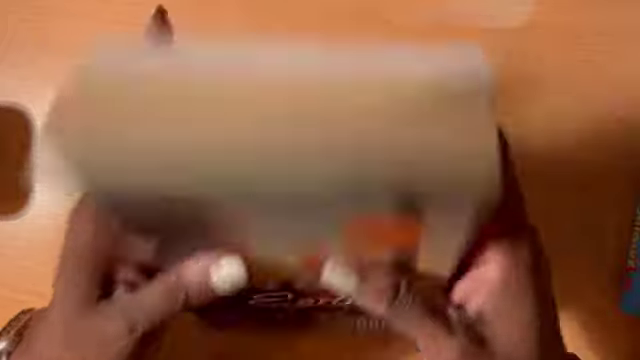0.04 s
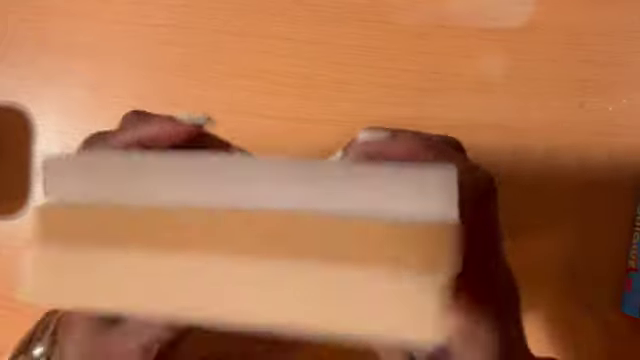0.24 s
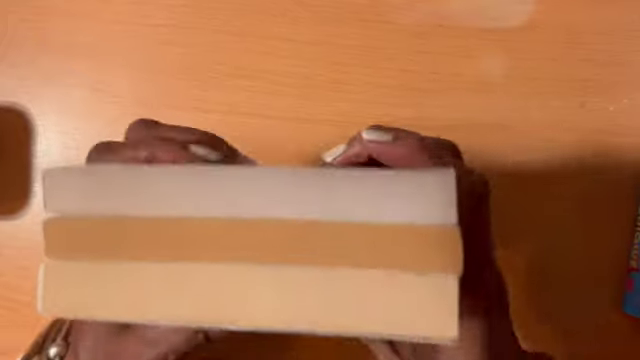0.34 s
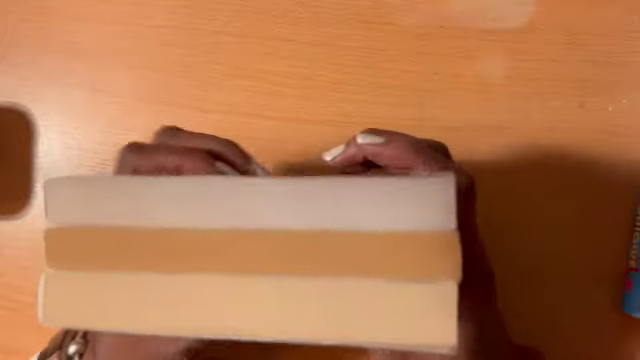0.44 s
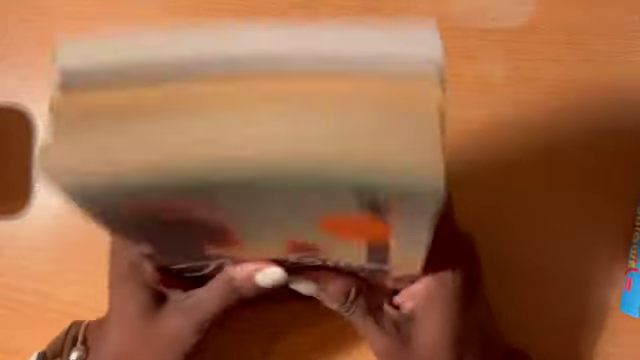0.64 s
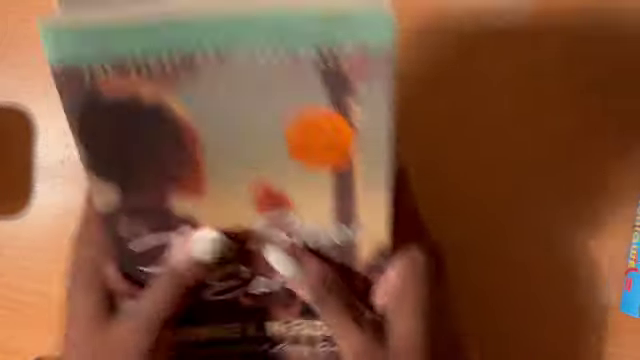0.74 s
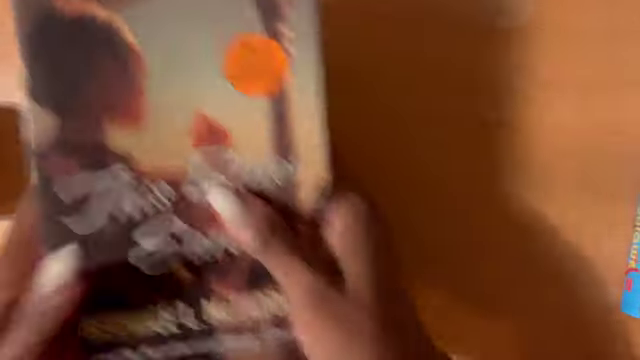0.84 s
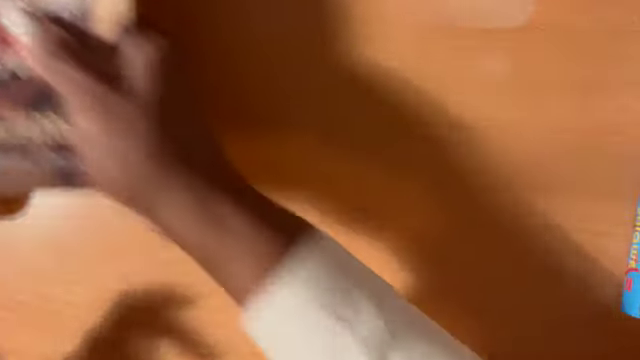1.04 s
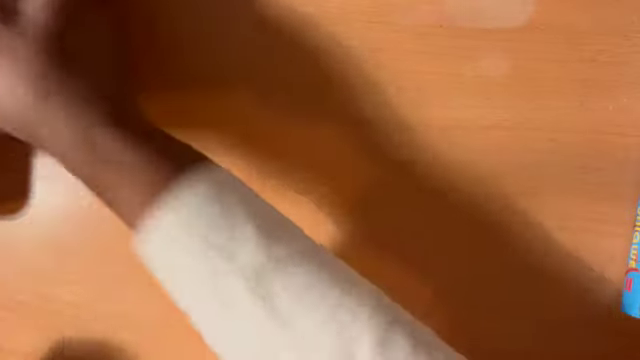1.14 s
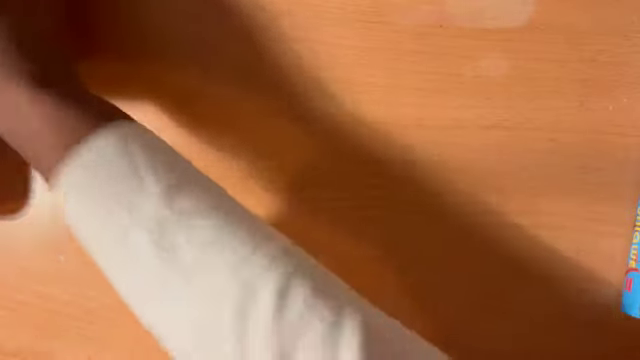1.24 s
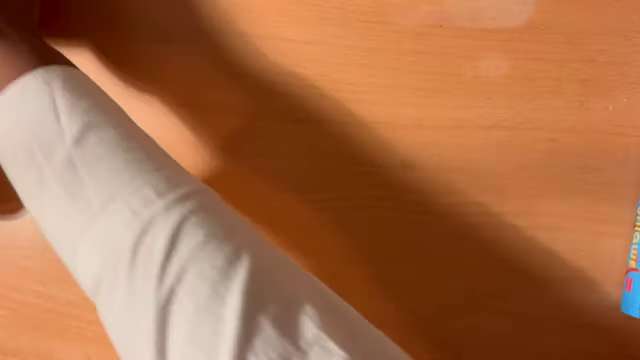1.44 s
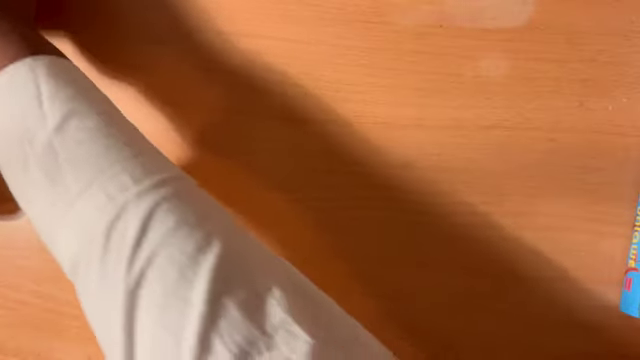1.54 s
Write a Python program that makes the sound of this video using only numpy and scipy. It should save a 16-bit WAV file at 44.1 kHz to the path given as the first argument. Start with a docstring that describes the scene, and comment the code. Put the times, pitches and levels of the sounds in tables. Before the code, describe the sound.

Close to the microphone in a quiet room, paperback books thump onto a wooden tabletop in quick succession. Papery snaps and rustling lead to a lighter knock, then faint sliding and a very soft final bump.

```python
"""A stack of paperbacks is stood on its edge on a wooden table, close to the microphone, in a small room.
From 0.24 s the books land one after another: each paper block knocks, claps and rings the tabletop.
The covers flick and rub as the stack is tipped flat, landing at 0.56 s.
It then slides away under the hands and is set down softly to one side at 1.5 s."""
import sys
import numpy as np
from scipy import signal
from scipy.fft import rfft, irfft
from scipy.io import wavfile

SR = 44100
rng = np.random.default_rng(int(sys.argv[2]) if len(sys.argv) > 2 else 0)


def put_to_file(sound):
    """Save the sound as 16-bit audio at rate SR, in the file named by the first command-line argument."""
    columns = np.atleast_2d(sound).T  # one column per channel
    safe = np.clip(columns, -1, 1)
    whole_steps = np.round(safe * 32767)
    wavfile.write(sys.argv[1], SR, whole_steps.astype(np.int16))


N = 70560
T = np.arange(N) / SR
HZ = np.maximum(np.arange(N // 2 + 1) * SR / N, 1)
AGE = np.arange(16384) / SR  # time within one event [s]
EVENT_HZ = np.maximum(np.arange(len(AGE) // 2 + 1) * SR / len(AGE), 1)

# books meeting the table: (time [s], level [dB], paper block pitch [Hz], share to lowest mode [dB])
LANDINGS = [(0.1275, -50.5, 677.6, -19), (0.1311, -46.5, 250.2, -44), (0.2364, -2.5, 764, -24.5),
            (0.2395, -7.5, 327, -12), (0.2449, -6, 562, -6.5), (0.2587, -17, 306, -16),
            (0.2633, -8.5, 319, -16.5), (0.2672, -9.5, 580, -2), (0.2815, -15.5, 560, -12.5),
            (0.2888, -15, 480, -29), (0.3009, -27.5, 267, -10), (0.558, -26.5, 970, -26.5),
            (0.5620, -25.5, 395, -17), (0.5728, -24, 315, -1.5), (1.1689, -44.5, 245.5, -44),
            (1.468, -50.5, 639, -32), (1.474, -48, 283, -19), (1.4989, -41, 189, -16),
            (1.543, -56, 147.8, -5.5)]
CUTOFF_PER_PITCH = 1.48  # a landing's bandwidth over its block pitch


def undb(db):
    """Decibels to gain."""
    return 10 ** (np.asarray(db) / 20)


def unit(x):
    """Scale to rms 1."""
    return x / np.sqrt(np.mean(x ** 2))


def curve(points, at=EVENT_HZ):
    """Interpolate (frequency [Hz], level [dB]) over log frequency."""
    hz, db = np.array(points).T
    return np.interp(np.log(at), np.log(hz), db)


def colour(pair, db, at=EVENT_HZ):
    """Two unrelated signals to stereo of rms 1 with this spectrum, narrow in the bass, wide above."""
    # stereo width: (frequency [Hz], side over mid [dB])
    side_levels = [(60, -9.5), (200, -13), (400, -8.5), (700, -1.5), (1250, 0), (2400, -3.5), (8000, -3.5),
                   (15000, -3.5)]
    mid, side = rfft(pair) * undb(db)
    width = undb(curve(side_levels, at))
    left_right = np.array([mid + width * side, mid - width * side]) / np.hypot(1, width)
    return unit(irfft(left_right))


def noise(db, at=EVENT_HZ):
    """Stereo noise with this spectrum."""
    return colour(rng.standard_normal((2, 2 * len(at) - 2)), db, at)


def fade(age, t60_s):
    """Exponential decay from age 0."""
    return (age >= 0) * np.exp(-np.log(1000) * np.maximum(age, 0) / t60_s)


def stroke(age, rise_s, hold_s, release_s):
    """Hand movement: linear rise, hold, then 20 dB down per release time."""
    return np.clip(age / rise_s, 0, 1) * 10 ** (-np.maximum(age - rise_s - hold_s, 0) / release_s)


def friction(moves, spectrum):
    """Smooth noise that follows a series of hand movements."""
    envelope = sum(undb(db) * stroke(T - start_s, *timing_s) for start_s, *timing_s, db in moves)
    return envelope * noise(curve(spectrum, HZ), HZ)


def add(out, start_s, x):
    """Mix in a short sound."""
    i = max(int(round(start_s * SR)), 0)
    out[:, i:i + x.shape[1]] += x[:, :N - i]


def air(level_db=-63.5):
    """Steady, quiet room air."""
    # (frequency [Hz], level [dB])
    spectrum = [(25, -1.5), (90, 0.5), (250, -10.5), (500, -19), (1000, -10), (1900, -9), (3000, -20),
                (6000, -24), (12000, -15.5), (16000, -20)]
    return undb(level_db) * noise(curve(spectrum, HZ), HZ)


def room(x, level_db=-17, t60_s=0.25, delay_s=0.0027):
    """Nearby walls add a short diffuse tail."""
    tail = noise(np.zeros(len(EVENT_HZ))) * fade(AGE - delay_s, t60_s)
    tail /= np.sqrt(np.sum(tail ** 2) / 2)
    return x + undb(level_db) * signal.fftconvolve(x, tail, axes=1)[:, :N]


def grips():
    """Hands shift on the stack: low rumble."""
    # hand shifts: (start [s], rise [s], hold [s], release [s], level [dB])
    moves = [(0.0, 0.025, 0.12, 0.059, -58.5), (0.33, 0.096, 0.051, 0.13, -51),
             (0.62, 0.019, 0.41, 0.11, -60), (1.12, 0.043, 0.061, 0.11, -65)]
    # rumble: (frequency [Hz], level [dB])
    spectrum = [(25, -15.5), (60, -4), (100, -4), (160, -7), (240, -4.5), (400, -19), (800, -18.5),
                (2000, -25), (16000, -69.5)]
    return friction(moves, spectrum)


def slides():
    """Smooth covers slide on wood and skin: high hiss."""
    # slides: (start [s], rise [s], hold [s], release [s], level [dB])
    moves = [(-0.02, 0.029, 0.093, 0.07, -48), (0.37, 0.094, 0.024, 0.17, -45),
             (0.59, 0.026, 0.26, 0.092, -58), (0.80, 0.076, 0.094, 0.037, -46),
             (0.98, 0.044, 0.13, .25, -59.5)]
    # hiss: (frequency [Hz], level [dB])
    spectrum = [(300, -10), (1500, -12.5), (3500, -13.5), (6000, -10), (8000, -3), (11000, 0.5), (12300, 2),
                (15500, 0.5)]
    return friction(moves, spectrum)


def cover_boost_db():
    """Spectral peaks where the covers ring."""
    # resonances: (centre [Hz], half-width [Hz], boost [dB])
    peaks = [(2160, 128, 10.5), (2830, 390, 4.5), (5200, 212, 8)]
    return sum(db / (1 + ((EVENT_HZ - hz) / width_hz) ** 2) for hz, width_hz, db in peaks)


def rubs(catches_per_s=1700, scatter_db=3, scrape_gain=0.5):
    """Cover catches and slips on cover: dense tiny clicks over a smoother scrape."""
    # rubs: (start [s], rise [s], hold [s], release [s], level [dB], tilt [dB/octave])
    moves = [(0.0, 0.0017, 0.03, .05, -51, 0), (0.302, 0.018, 0.026, 0.15, -49.5, -4.5),
             (0.412, 0.0036, 0.046, 0.068, -47.5, 4.5), (0.472, 0.05, 0.026, 0.086, -35.5, -2),
             (0.595, 0.0093, 0.015, 0.44, -60.5, -0.5), (0.814, 0.018, 0.019, 0.21, -57, 1.5),
             (0.98, 0.033, 0.049, 0.16, -65.5, -2), (1.097, 0.02, .015, 0.053, -54, 0.5),
             (1.107, 0.05, .06, 0.29, -67, -2), (1.453, 0.0056, 0.034, 0.029, -55.5, -5)]
    # paper friction: (frequency [Hz], level [dB])
    spectrum = [(30, -17), (90, -10.5), (250, -4), (550, 0), (1000, -2.5), (1500, -2), (2200, -8.5),
                (3200, -6), (4300, -9.5), (7000, -13), (12000, -13), (16000, -22)]
    out, shape = np.zeros((2, N)), (2, len(AGE))
    for start_s, *timing_s, db, tilt_db in moves:
        catches = (rng.random(shape) < catches_per_s / SR) * np.sign(rng.standard_normal(shape))
        catches *= undb(scatter_db * rng.standard_normal(shape))
        rasp = unit(catches) + scrape_gain * rng.standard_normal(shape)
        spectrum_db = curve(spectrum) + cover_boost_db() + tilt_db * np.log2(EVENT_HZ)
        add(out, start_s, undb(db) * stroke(AGE, *timing_s) * colour(rasp, spectrum_db))
    return out


def scuffs():
    """A book edge or finger chatters as it drags: an unsteady tone that may glide."""
    # drags: (start [s], rise [s], hold [s], release [s], level [dB],
    #         centre [Hz], half-width [Hz], glide [Hz/s])
    drags = [(0.042, .015, .045, 0.025, -62.5, 3080, 180, -7500),
             (0.213, 0.014, 0.029, .004, -36, 864, 173, 1507),
             (0.047, 0.013, 0.043, 0.019, -57.5, 297, 135, 3),
             (0.2645, 0.00064, 0.0012, 0.02, -34.5, 2690, 450, -3),
             (0.558, 0.0021, 0.0105, 0.015, -37.5, 430, 111, 4),
             (0.832, 0.01, .02, 0.043, -67, 3200, 600, 0),
             (1.105, 0.0068, 0.021, 0.063, -62.5, 2200, 504, 0),
             (1.270, 0.0017, 0.00091, 0.0056, -64.5, 4580, 506, 1.5),
             (1.453, 0.01, 0.022, 0.047, -56, 1400, 400, 1.5),
             (1.46, 0.0047, 0.011, 0.037, -72, 5100, 1004, -2.5)]
    out = np.zeros((2, N))
    for start_s, *timing_s, db, hz, width_hz, glide_hz_per_s in drags:
        band = noise(-20 * np.log10(1 + ((EVENT_HZ - hz) / width_hz) ** 4))
        chatter = np.real(signal.hilbert(band) * np.exp(1j * np.pi * glide_hz_per_s * AGE ** 2))
        add(out, start_s, undb(db) * stroke(AGE, *timing_s) * chatter)
    return out


def flicks(rise_s=0.00027, t60_s=0.017):
    """Covers and page edges slip past each other: short papery snaps."""
    # snaps: (time [s], level [dB], left minus right [dB])
    snaps = [(0.2363, -29.5, 3), (0.4191, -33.5, -1), (0.4271, -32, 4), (0.477, -34.5, 4), (0.4857, -26, 0),
             (0.5069, -25, -2), (0.516, -29, 5), (0.5238, -32, -4), (0.533, -31, -7), (0.546, -56, -12),
             (0.5729, -32.5, 2.5), (0.6272, -41.5, 2), (1.109, -71, 9), (1.1243, -56, 6),
             (1.272, -66.5, -11)]
    # one snap: (frequency [Hz], level [dB])
    spectrum = [(150, -11.5), (500, 3.5), (1200, 1), (1700, -3.5), (3300, -7), (4300, -7), (6500, -12.5),
                (8500, -9.5), (12000, -10), (16000, -19)]
    out = np.zeros((2, N))
    spectrum_db = curve(spectrum) + cover_boost_db()
    envelope = np.minimum(AGE / rise_s, 1) * fade(AGE, t60_s)
    for start_s, db, pan_db in snaps:
        pan = undb([[pan_db / 2], [-pan_db / 2]])
        add(out, start_s, undb(db) * pan * envelope * noise(spectrum_db))
    return out


def mode(hz, t60_s, times_s, amplitudes, load_s=0.003, spread_rad_per_khz=0.53):
    """One tabletop mode: each landing loads it with energy, which then drains away."""
    push = np.zeros(N)
    push[np.round(times_s * SR).astype(int)] = amplitudes ** 2
    drain_pole = np.exp(-2 * np.log(1000) / (t60_s * SR))
    load_pole = np.exp(-1 / (load_s * SR))
    energy = signal.lfilter([1 - load_pole], np.poly([drain_pole, load_pole]), push + 1e-18)
    channel_rad = np.array([[-0.5], [0.5]]) * spread_rad_per_khz * hz / 1000
    return np.sqrt(energy) * np.sin(2 * np.pi * (hz * T + rng.random()) + channel_rad)


def tabletop(ring_db=-17.5, drum_hz=99.5, drum_t60_s=0.19):
    """The top drums at its lowest mode and rings at the rest; low-pitched landings ring duller."""
    # upper modes: (frequency [Hz], level [dB], t60 [s])
    wood_modes = [(127.44, 6, .11), (229, -6, 0.16), (274, -0.5, 0.12), (317.7, -7.5, .13),
                  (354.6, -1, 0.16), (384.7, -4.5, 0.083), (439.4, -3.5, .14), (528.5, -7, 0.22),
                  (563.6, 0.5, 0.096), (590, -6, 0.094), (704, -3, .1), (883.5, -4, 0.13), (1028, -11, .12),
                  (1144.4, -2, 0.14), (1375, -16, 0.098)]
    times_s, db, pitch_hz, drum_db = np.array(LANDINGS).T
    ring = np.zeros((2, N))
    for hz, mode_db, t60_s in wood_modes:
        rolloff = np.hypot(1, (hz / (CUTOFF_PER_PITCH * pitch_hz)) ** 2)
        ring += mode(hz, t60_s, times_s, undb(db + mode_db) / rolloff)
    drum = mode(drum_hz, drum_t60_s, times_s, undb(db + drum_db))
    return undb(ring_db) * ring + drum


def landings(rise_cycles=0.74, left_lag_s=0.00018, clap_t60_s=0.16):
    """Each paper block knocks for a few cycles; trapped air and paper give a dull clap."""
    # clap before its low-pass: (frequency [Hz], level [dB])
    clap_spectrum = [(25, -17), (60, -8.5), (120, -2.5), (200, -8.5), (400, -4), (800, -7), (1150, -1),
                     (1600, -5), (3000, -14), (6000, -10), (12000, 2.5), (16000, -6)]
    out = np.zeros((2, N))
    for start_s, db, pitch_hz, _ in LANDINGS:
        cycles = np.maximum(AGE - np.array([[left_lag_s], [0]]), 0) * pitch_hz
        swell = cycles / rise_cycles
        knock = swell * np.exp(1 - np.minimum(swell, 50)) * np.sin(2 * np.pi * cycles)
        lowpass_db = -20 * np.log10(1 + (EVENT_HZ / (CUTOFF_PER_PITCH * pitch_hz)) ** 2)
        clap = noise(curve(clap_spectrum) + lowpass_db) * np.minimum(cycles, 1) * fade(AGE, clap_t60_s)
        clap_db = -15 + 0.13 * db  # gentle contacts clap less
        add(out, start_s, undb(db) * (knock + undb(clap_db) * clap))
    return out


def scene():
    """Books, table and hands in the room, over its air."""
    books = landings() + tabletop() + flicks() + rubs() + scuffs() + slides() + grips()
    return room(books) + air()


def record(dry, top_hz=15850):
    """The microphone leans right, has two narrow treble dips and cuts the top."""
    # channel balance: (frequency [Hz], left minus right [dB])
    balance = [(60, 2), (180, 0.5), (400, -0.5), (1200, -2), (2400, -0.5), (4400, -7.5), (8000, -1),
               (15000, 0.5)]
    # treble dips: (centre [Hz], half-width [Hz], depth [dB])
    dips = [(9538, 722, 28), (14400, 650, 28.5)]
    balance_db = np.array([[0.5], [-0.5]]) * curve(balance, HZ)
    dips_db = sum(db * np.exp(-((HZ - hz) / width_hz) ** 2) for hz, width_hz, db in dips)
    heard = irfft(rfft(dry) * undb(balance_db - dips_db), N)
    return signal.sosfilt(signal.ellip(10, 0.2, 80, top_hz, fs=SR, output="sos"), heard)


dry = scene()
out = record(dry)
put_to_file(out)
```